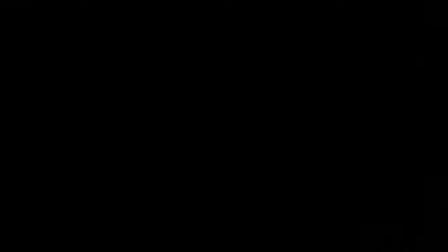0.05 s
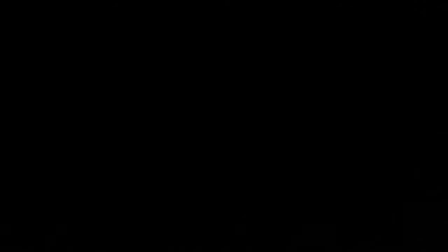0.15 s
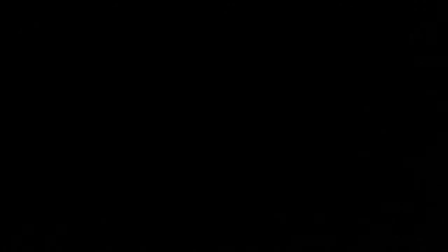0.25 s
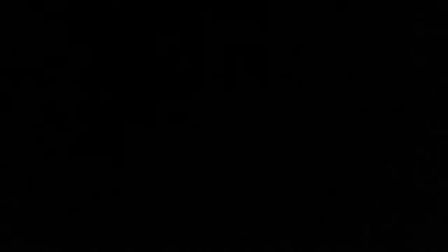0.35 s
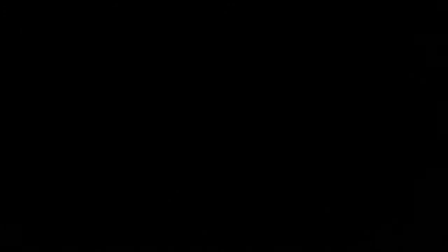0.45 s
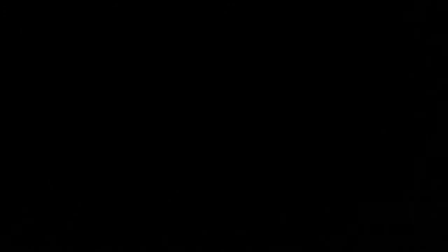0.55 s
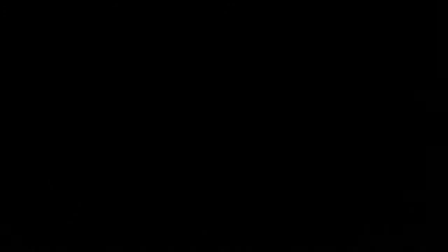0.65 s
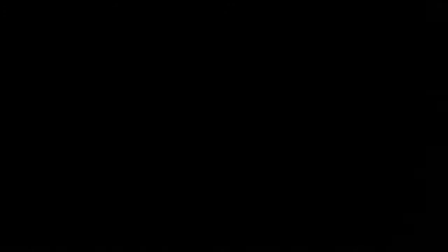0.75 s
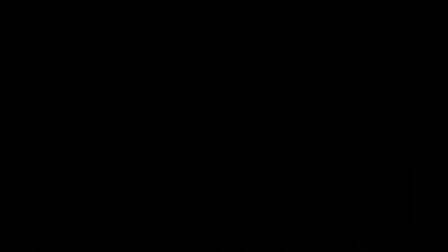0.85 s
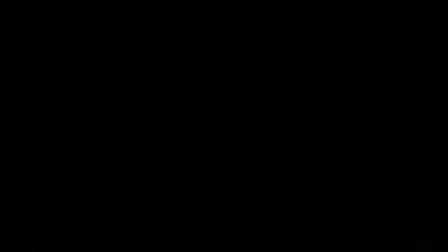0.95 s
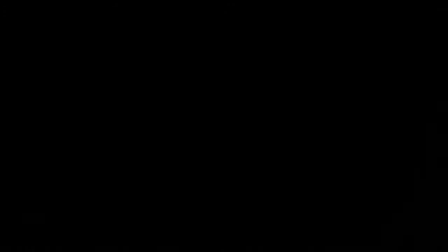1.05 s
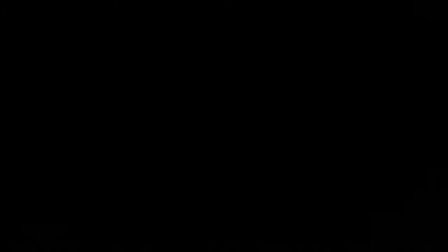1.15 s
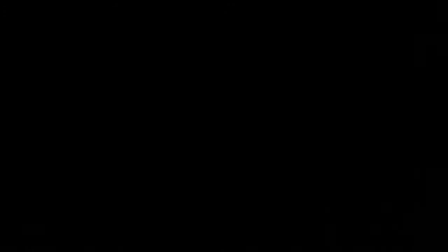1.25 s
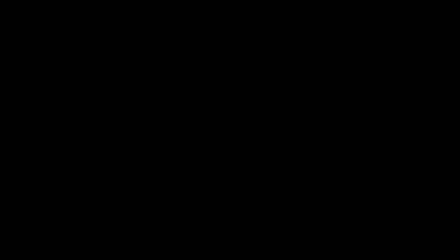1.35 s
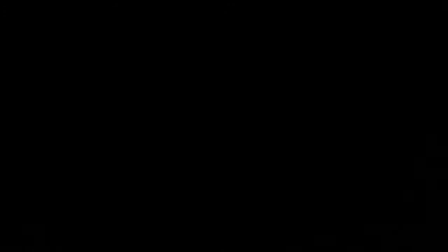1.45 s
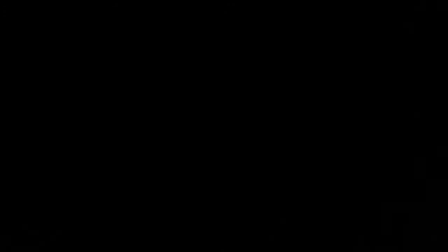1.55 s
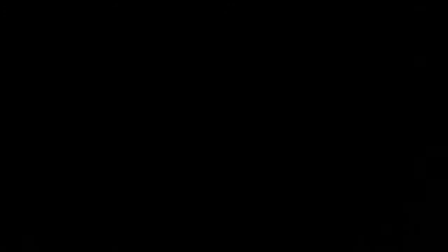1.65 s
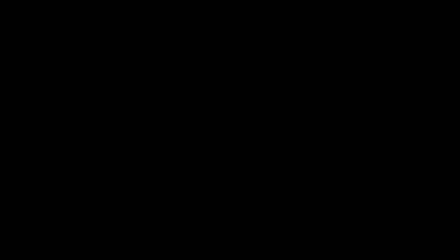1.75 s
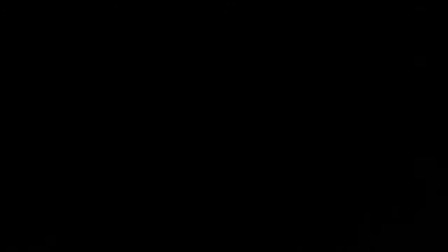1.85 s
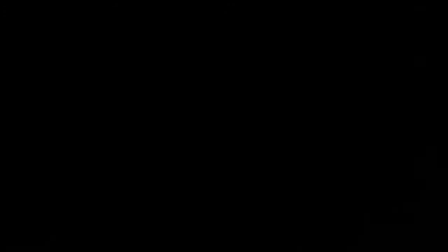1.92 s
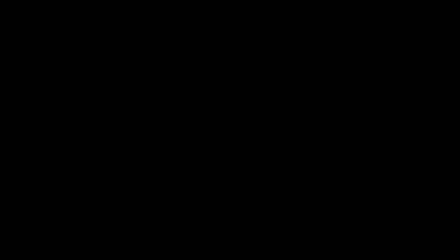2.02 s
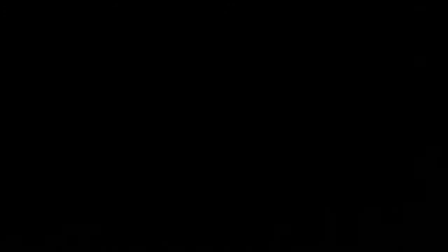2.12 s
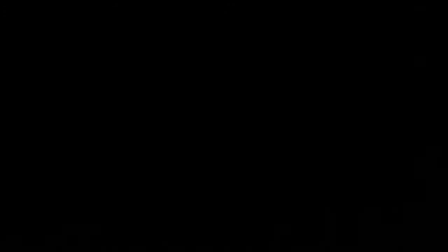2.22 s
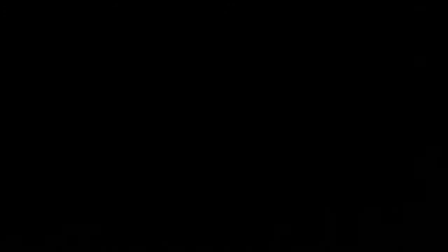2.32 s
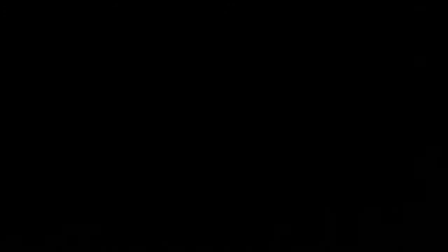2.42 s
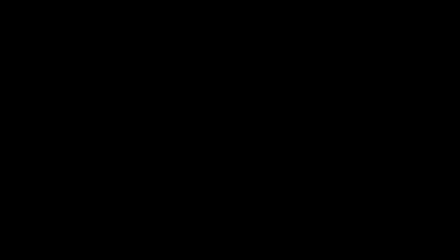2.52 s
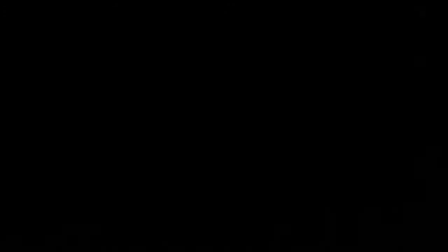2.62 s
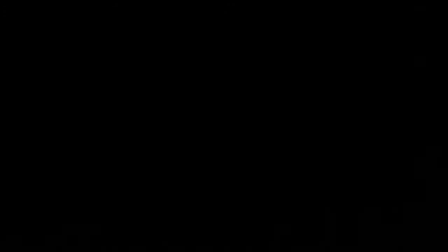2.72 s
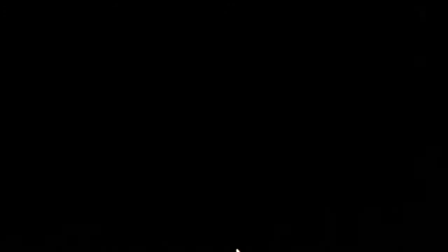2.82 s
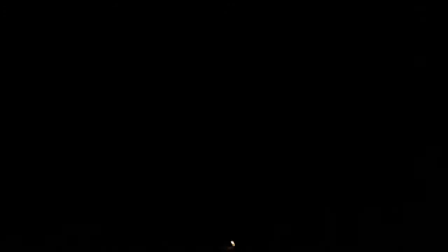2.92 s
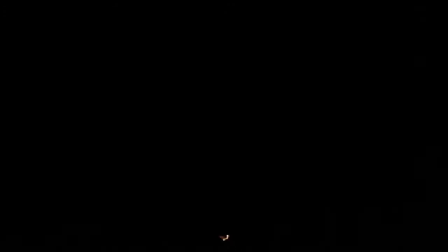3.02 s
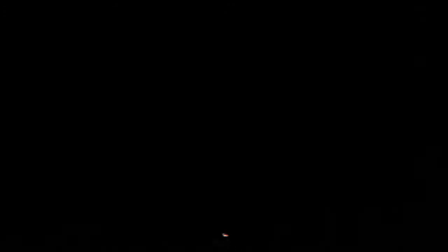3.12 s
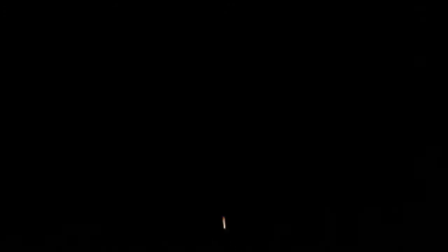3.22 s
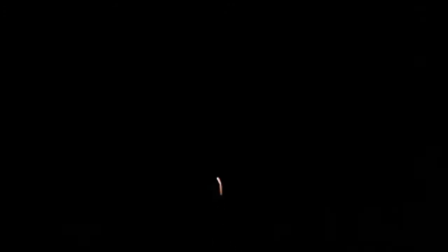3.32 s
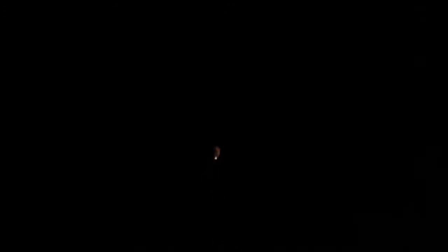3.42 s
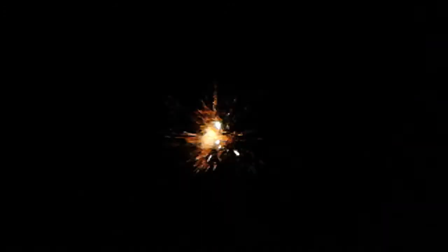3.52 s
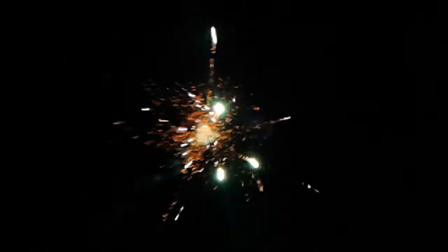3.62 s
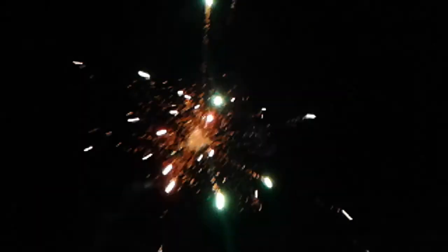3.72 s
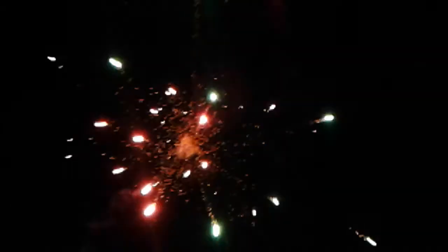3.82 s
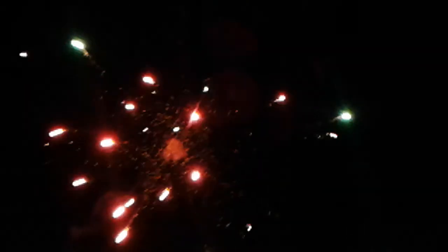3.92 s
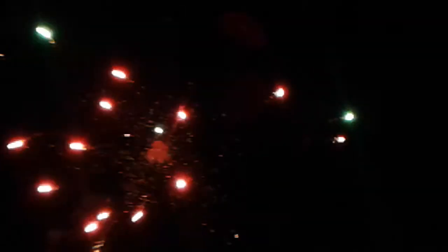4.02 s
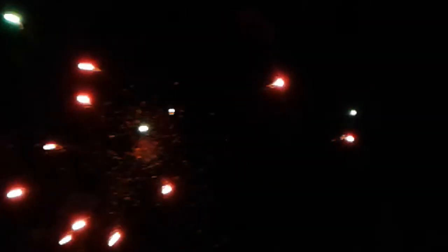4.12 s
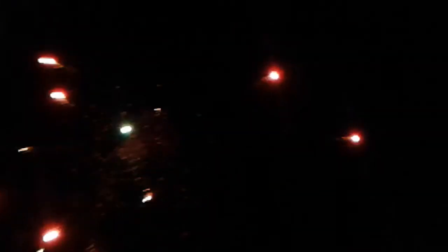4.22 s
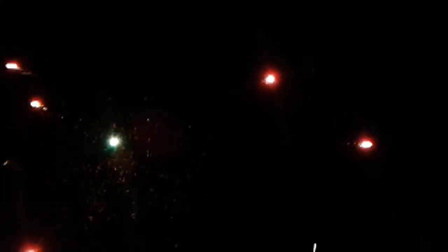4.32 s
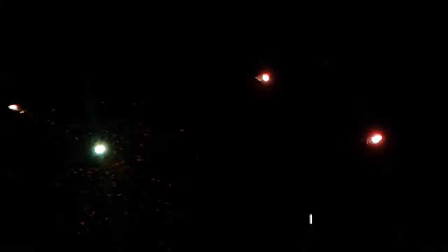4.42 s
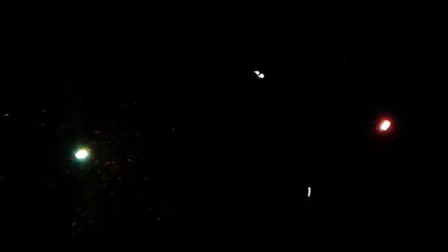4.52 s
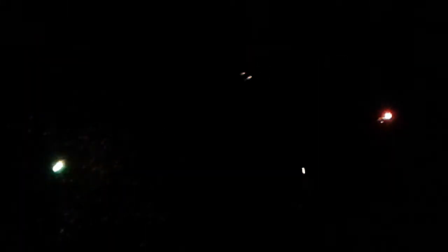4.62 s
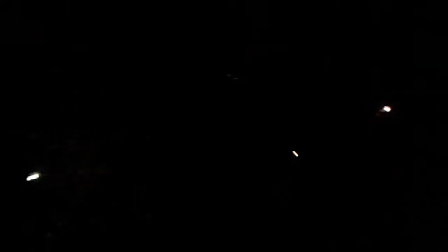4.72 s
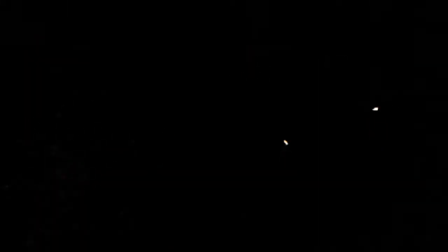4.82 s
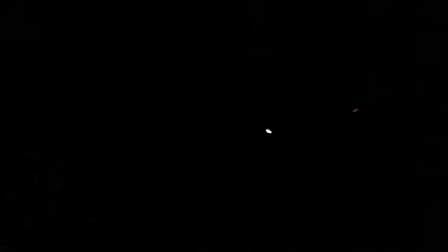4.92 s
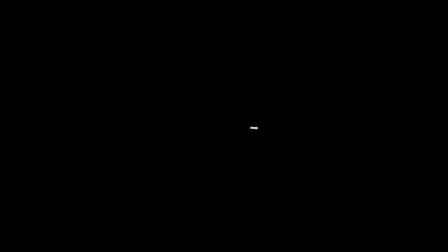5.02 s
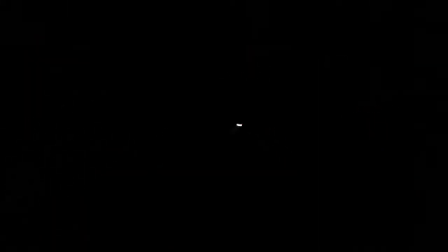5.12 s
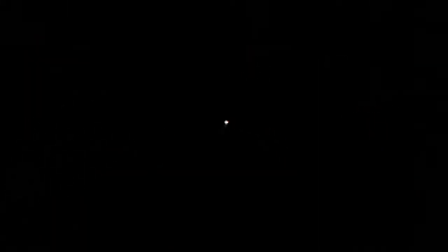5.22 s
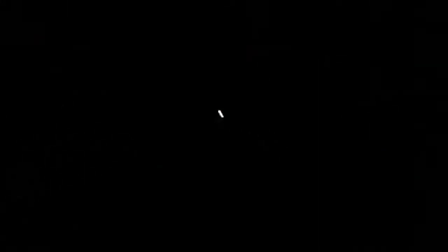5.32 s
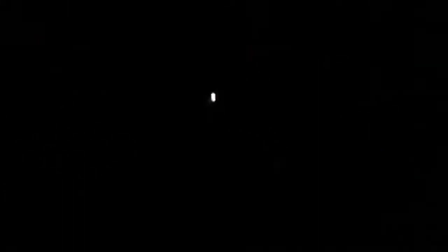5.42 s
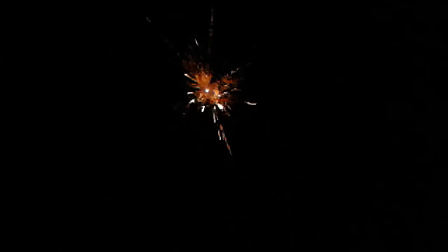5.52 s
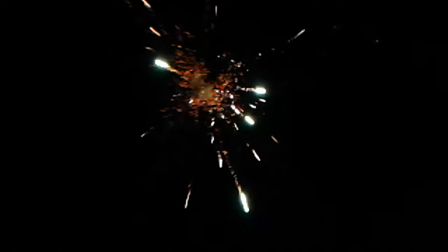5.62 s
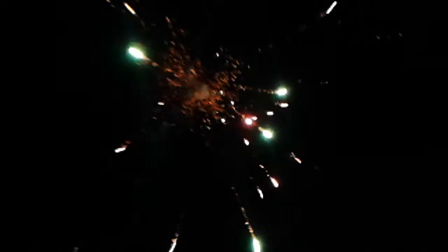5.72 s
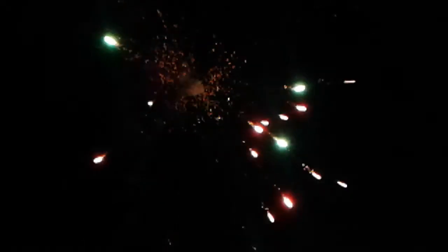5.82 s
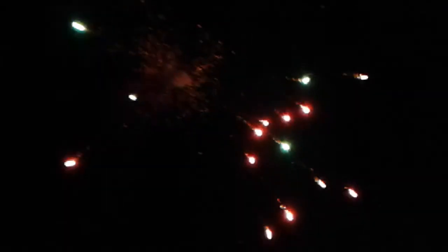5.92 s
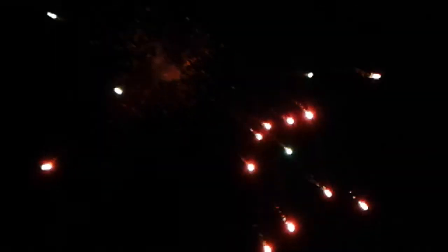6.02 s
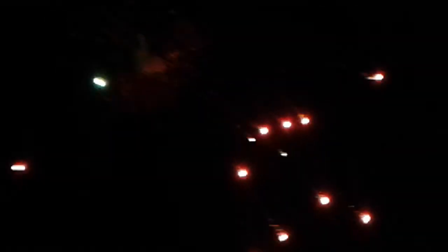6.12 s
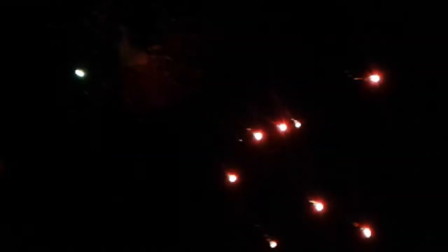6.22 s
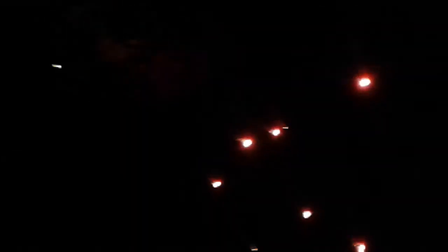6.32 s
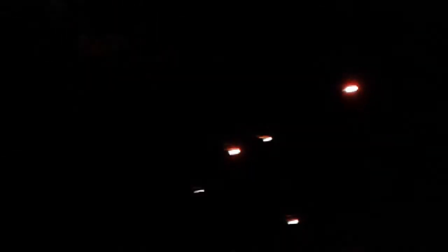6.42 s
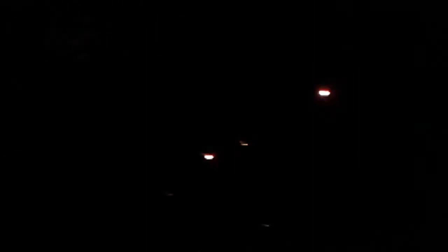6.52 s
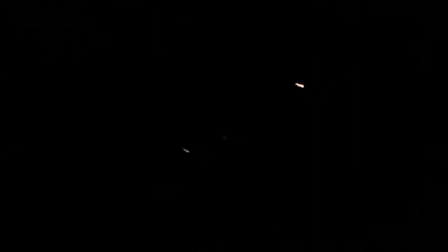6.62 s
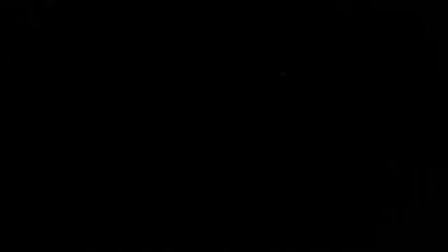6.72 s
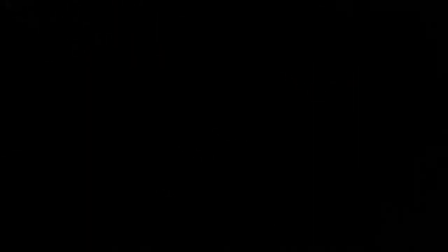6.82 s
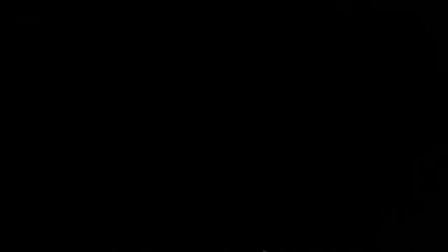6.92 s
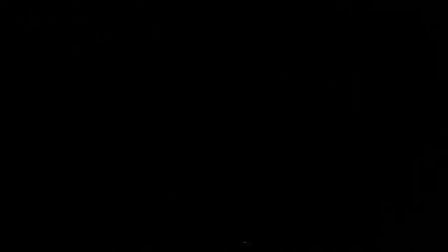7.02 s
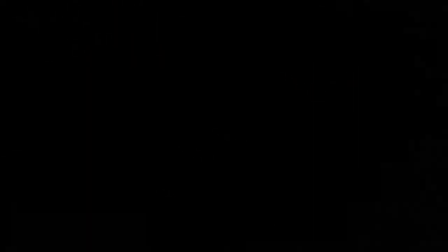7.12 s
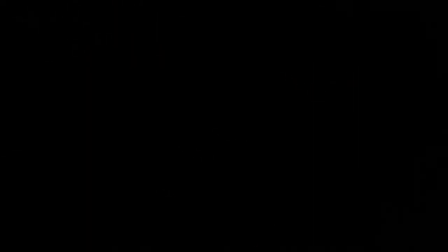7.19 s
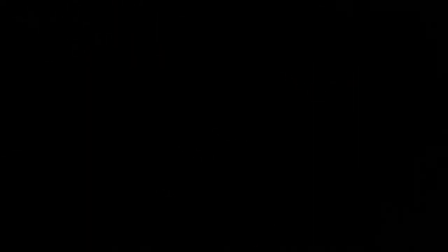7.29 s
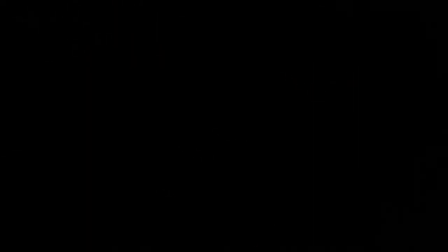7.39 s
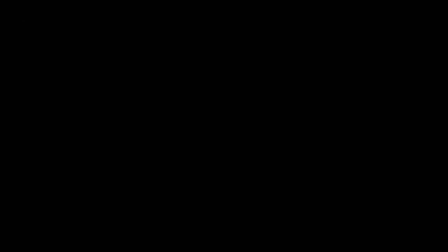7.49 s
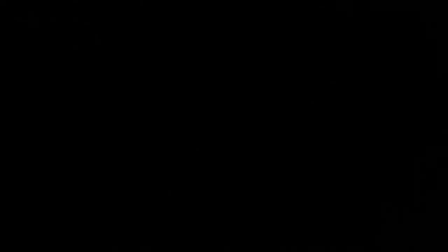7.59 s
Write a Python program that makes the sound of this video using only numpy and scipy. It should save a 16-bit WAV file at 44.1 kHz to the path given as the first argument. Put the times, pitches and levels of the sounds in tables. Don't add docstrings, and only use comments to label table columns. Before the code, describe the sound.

Two firework rockets launch with hard thumps in a walled yard at night, shriek down in pitch, and burst with loud overloading cracks.

```python
import sys
import numpy as np
from scipy import signal
from scipy.fft import rfft, irfft, next_fast_len
from scipy.io import wavfile
from scipy.ndimage import uniform_filter1d

SR = 44100
rng = np.random.default_rng(int(sys.argv[2]) if len(sys.argv) > 2 else 0)


def dump_mix(stems):
    frames = np.atleast_2d(stems).T
    limited = np.clip(frames, -1, 1)
    pcm = np.round(limited * 32767).astype(np.int16)
    wavfile.write(sys.argv[1], SR, pcm)


def gain_from_db(level_db):
    decades = np.asarray(level_db, float) / 20
    return 10 ** decades


N = 337409

# (frequency [Hz], level [dB])
NIGHT_COLOUR = [(24, -45.5), (60, -2.5), (120, -8), (300, -7), (600, -11), (1000, -19), (2000, -15),
                (2600, -24.5), (2900, -31.5), (4500, -35), (6500, -28.5), (9000, -35.5), (15000, -34)]
# (frequency [Hz], likeness [-1 to 1])
NIGHT_SAME = [(60, 0.04), (180, 0.94), (540, 0.26), (1630, 0.31), (4900, 0.01), (14700, 0.03)]
# (frequency [Hz], level [dB], width [Hz])
MACHINE_LINES = [(506.5, -50, 43), (744, -56, 34), (884, -58, 13), (1550, -54, 14), (1720, -59.5, 25),
                 (2024, -42.5, 5.8), (2250, -61.5, 26), (2520, -64.5, 26)]
# (peak time [s], level [dB], rise [s], fall [s])
GUSTS = [(.72, -43, 0.6, 0.66), (1.62, -37.5, 0.083, 0.29), (2.83, -48, 0.22, 0.58),
         (3.26, -59, 0.41, 0.31), (3.622, -47.5, 0.23, 0.11), (3.75, -61, .3, 0.67),
         (4.77, -37.5, 0.3, 0.39), (5.41, -44.5, 0.69, 0.76), (5.9, -55, 0.38, 0.21),
         (7.139, -38.5, 0.38, 0.04)]
# (time [s], level [dB], left over right [dB], frequency
# [Hz], length [cycles])
KNOCKS = [(0.766, -30, -23, 115, 0.59), (0.797, -37, 24, 169, 1.9), (0.81, -31, 5, 67, 2.6),
          (0.91, -26, 15, 106, 0.72), (0.883, -29, 31, 98, 0.93), (0.88, -27, 23, 274, 1.2),
          (0.85, -30, 9, 174, 1.8), (0.63, -36, 5, 135, 1.1), (0.78, -38, 0, 130, 1.2),
          (4.725, -32, 16, 84, 1.06), (4.79, -37, 3, 140, .8), (4.849, -28, 6, 185, 1.9),
          (4.845, -36, 8, 82, 1.6), (5.199, -32, -6, 130, 1.1), (5.301, -31.5, 21, 130, .8),
          (5.325, -35, 14, 100, 1), (5.394, -37.5, -9, 87, 0.76), (5.475, -35.5, -9.5, 110, 1.1),
          (5.506, -29.5, -15, 110, .8), (3.641, -7.5, -1, 190, 2.7), (5.68, -12.5, -5, 230, 1.8),
          (3.468, -11.5, -3, 100, 1.2), (1.334, -17, -2, 210, 0.83), (7.008, -20.5, 3, 93, 0.82),
          (7.035, -37, 21, 91.5, 1.12)]
# (time [s], level [dB], frequency [Hz], width [Hz], rise [s])
TICKS = [(1.028, -38.5, 2600, 1810, 0.022), (1.039, -52, 6720, 2500, 0.022),
         (1.241, -48, 6400, 2940, 0.0045), (6.85, -54, 6340, 2500, 0.027), (6.903, -41.5, 896, 897, .003),
         (7.089, -60, 6770, 2500, 0.0297), (7.28, -38, 7230, 6000, 0.0018),
         (7.399, -38.5, 6000, 4900, 0.0021), (7.47, -54, 5990, 296, 0.0055), (5.918, -37, 4480, 500, 0.011),
         (6.059, -42, 6500, 2060, 0.009)]
# (time [s], peak [dB], left over right [dB], T60 [s], treble [dB])
LAUNCHES = [(1.331, -3, -1, 0.048, -34), (1.348, -2.5, -0.5, 0.23, -8.5), (1.358, -1, -2, 0.034, -4),
            (1.438, -14.5, 1, 0.35, 9.5), (1.618, -17, 1.5, 0.091, 7.5), (3.434, -7.5, 2.5, 0.034, -34),
            (3.448, 0, 1, 0.11, -8.5), (3.463, -8, -3, 0.12, -14)]
# (time [s], peak [dB], left over right [dB], T60 [s], treble [dB])
BURSTS = [(3.633, 13.5, -2, 0.071, -4.5), (3.664, -2.5, -1, 0.11, -4), (3.768, -9, 6, 0.027, -9),
          (3.8, -6, -3, 0.046, 5), (3.883, -10.5, 1, 0.12, -10), (5.6701, 5.5, -3, 0.093, 1.5),
          (5.699, -5.5, -4, 0.16, -2.5), (5.745, -21.5, 0, 0.088, -1.5), (5.805, -20.5, -9, 0.076, -8.5),
          (5.842, -12.5, -6, 0.056, -18), (5.924, -14.5, -2, 0.063, -17), (5.922, -24.5, -3.5, 0.47, -4)]
# (frequency [Hz], density [dB per Hz])
LAUNCH_COLOUR = [(24, -57), (50, -14), (120, -2), (300, -1.5), (600, -12.5), (1000, -6.5), (1600, -16),
                 (3000, -16), (4800, -19), (6800, -8), (10000, -26.5), (15000, -59)]
# (frequency [Hz], density [dB per Hz])
BURST_COLOUR = [(24, -68.5), (40, -31), (200, -7), (260, -7.5), (400, -5.5), (640, -9), (1700, -20),
                (3470, -22.5), (8070, -26), (12000, -51), (15000, -44.5)]
# (time [s], rumble [dB], fall [dB/s], treble [dB], treble fade [s])
ROLLS = [
    (1.381, -36.5, 33.5, -9, 0.24),
    (3.48, -39.5, 17, 26.5, 2.5),
    (3.68, -30.5, 13, 25, 0.64),
    (5.721, -32, 24, 20, 0.68),
]
# (time [s], level [dB], swell [s])
HILLS = [
    (5.682, -32.5, 0.28),
    (7.68, -29, 0.14),
]
# (frequency [Hz], density [dB per Hz])
ROLL_COLOUR = [(24, -49), (40, -35.5), (125, -2.5), (466, 1.5), (514, -2.5), (1290, -13.5), (2640, -29.5),
               (6620, -27), (11400, -53), (15000, -55)]
# (frequency [Hz], likeness [-1 to 1])
ROLL_SAME = [(60, 0.67), (180, 1), (540, 0.8), (1630, 0.06), (4900, -0.0), (14700, 0.42)]
# (time [s], pitch [Hz])
PITCH = [
    [(1.42, 2925), (1.432, 3200), (1.443, 3824), (1.536, 3692), (1.596, 3368), (2.3, 2707), (2.75, 2395),
     (3.05, 2274), (3.62, 2200)],
    [(3.51, 3150), (3.55, 3280), (3.568, 3758), (3.603, 3695), (3.622, 3440), (4.0, 3058), (4.6, 2645),
     (5.1, 2401), (5.668, 2200)],
]
# (time [s], swing [%], half length [s])
LURCHES = [
    [(1.554, -1.56, 0.0052), (1.64, 3.5, 0.022), (1.683, -1.3, 0.014), (1.783, 2, 0.038),
     (1.837, -1, 0.026), (1.919, -1.5, 0.012), (1.935, 2.5, 0.015), (1.985, 3, 0.021), (2.031, -4.5, 0.046),
     (2.096, 3.5, 0.016), (2.124, 0, 0.0057), (2.166, -4.5, 0.049), (2.23, 5, 0.01), (2.272, 2, 0.017),
     (2.328, -3.5, 0.077), (2.408, 4.5, 0.033), (2.464, -3.5, 0.046), (2.583, -2, 0.064),
     (2.665, 0.5, 0.11), (2.711, -2.5, 0.029), (2.805, -2.2, 0.056), (2.941, -1, 0.06), (3.022, 1.8, 0.026),
     (3.178, -0.7, 0.024), (3.25, 1, 0.053), (3.324, -1.5, 0.055), (3.396, 1.5, 0.016), (3.435, -3, 0.076),
     (3.489, -3, 0.027), (3.539, 1.5, 0.013)],
    [(3.532, -2.5, 0.083), (3.69, 5, 0.024), (3.708, 1.1, 0.013), (3.735, -1.15, 0.028),
     (3.771, -1.5, 0.042), (3.807, 0.06, 0.013), (3.835, 2.5, 0.014), (3.871, -0.9, 0.029),
     (3.925, 2.7, 0.027), (3.951, -1, 0.013), (3.995, 0.2, 0.018), (4.015, -1.1, 0.015),
     (4.017, 3.3, 0.032), (4.049, 1, 0.0081), (4.065, -1.5, 0.0097), (4.131, 0.8, 0.072),
     (4.274, -0.8, 0.053), (4.408, -2, 0.051), (4.454, -1.5, 0.011), (4.49, -0.4, 0.027),
     (4.56, -2.0, 0.03), (4.611, 2, 0.015), (4.731, -2.5, 0.044), (4.847, -1, 0.023), (4.899, -1.4, 0.078),
     (5.021, 1.5, 0.063), (5.094, 0.5, 0.0071), (5.338, -0.8, 0.039), (5.458, -0.3, 0.087),
     (5.587, 0.5, 0.019)],
]
# (time [s], change [dB], half length [s])
NODS = [
    [(1.614, 0, 0.0098), (1.707, 3.5, 0.062), (1.773, 2.5, 0.014), (1.803, -3.5, 0.017), (1.841, 7, 0.019),
     (1.997, -1.5, 0.091), (2.045, -7, 0.0066), (2.106, 1.5, 0.075), (2.34, -2.5, 0.14),
     (2.422, 1.5, 0.046), (2.514, 2.5, 0.0068), (2.555, -5, 0.026), (2.701, -8.5, 0.019),
     (2.735, 5.5, 0.027), (2.766, 0.5, 0.012), (2.881, -16, 0.0087), (2.933, -9, 0.029),
     (3.006, 3.5, 0.051), (3.048, -12, 0.012), (3.075, 2.5, 0.017), (3.098, 3.5, 0.01), (3.13, 6.5, 0.046),
     (3.163, -13.5, 0.015), (3.195, 4, 0.011), (3.21, -8, 0.01), (3.244, 2.5, 0.08), (3.27, -6, 0.026),
     (3.302, -5.5, 0.0092), (3.37, 7, 0.031), (3.4, -10.5, 0.011), (3.415, 4, 0.014), (3.457, -8.5, 0.035),
     (3.501, 4.5, 0.02), (3.533, 1, 0.012), (3.567, -20, 0.011), (3.593, 3, 0.012)],
    [(3.558, 7.5, 0.013), (3.654, -4.5, 0.096), (3.712, 6, 0.031), (3.847, 6.5, 0.039),
     (3.889, -4.5, 0.079), (4.107, -5, 0.013), (4.188, 4, 0.015), (4.252, 5, 0.016), (4.266, -4, 0.016),
     (4.282, 5.5, 0.015), (4.298, -5, 0.014), (4.34, 1.5, 0.042), (4.444, -6.5, 0.069), (4.472, -7, 0.011),
     (4.512, -3, 0.008), (4.584, 0, 0.031), (4.627, -9.5, 0.027), (4.699, 2, 0.014), (4.763, 2.5, 0.055),
     (4.823, -3, 0.009), (4.869, -6, 0.09), (4.933, 2.5, 0.035), (5.047, -2, 0.035), (5.088, -1.5, 0.023),
     (5.212, -4, 0.048), (5.292, 4, 0.025), (5.33, 5, 0.014), (5.392, 3.5, 0.043), (5.517, -3.5, 0.049),
     (5.661, -8, 0.031)],
]
# (droop [share], length [s])
DROOPS = [
    (0.054, 0.08),
    (0.055, 0.016),
]
# (time [s], level [dB])
EFFORT = [
    [(1.42, -16), (1.45, -26.5), (1.5, -19.5), (1.75, -11), (2.2, -11), (2.7, -10), (2.92, -14),
     (3.56, -12), (3.62, -29.5)],
    [(3.51, -29.5), (3.57, -16), (3.73, -15.5), (4.15, -24), (4.46, -19.5), (4.78, -15.5), (5.07, -7),
     (5.2, -13), (5.668, -11.5)],
]
# (fundamental [dB], its fall [dB/s], hiss fall [dB/s], half lines [dB], their delay [s])
VOICES = [
    (-18.5, 11.5, 0.5, -14.5, 0.02),
    (-25.5, 4, 0.85, -1.5, 0.31),
]
# (port lag [s], hiss [dB], lock-in [s], flutter [0-1], pitch wobble [share])
ROCKETS = [
    (.00016, -30.5, 0.021, 0.72, 0.0027),
    (.0002, -30.5, 0.059, 0.68, 0.0025),
]
TUBE_ORDERS = (1, 2, 3, 4, 5, 6, .5, 1.5, 2.5)
# (pitch [Hz], third partial [dB], fourth and higher [dB])
TUBE = [(2200, -34.5, -30.5), (2308, -21, -21.5), (2600, -16, -21.5), (3200, -21, -22), (3490, -21.5, -31),
        (3590, -17.5, -24.5)]
# (time [s], change [dB], half length [s])
SWELLS_AND_DIPS = [(1.582, 2.5, 0.034), (1.662, 2, 0.023), (1.735, -2, 0.0092), (1.839, -5, 0.0087),
                   (1.889, 2, 0.023), (1.93, 4, 0.0069), (2.058, -3, .02), (2.22, -1, 0.025), (2.618, 4, .007),
                   (2.738, -2, 0.022), (3.128, -1, 0.011), (3.144, 3, 0.0098), (3.257, 5.5, 0.014),
                   (3.301, 2, 0.011), (3.422, -5, 0.012), (3.764, 3, .009), (3.796, -11, .006), (3.939, 3.5, 0.0099),
                   (3.973, 5, 0.011), (4.07, 1.5, .02), (4.133, 2, 0.008), (4.206, 2.5, 0.032), (4.317, -2, 0.0035),
                   (4.327, -7, 0.0036), (4.341, 2.5, .015), (4.389, 5, .009), (4.405, -8, 0.0042), (5.096, 5.5, .01),
                   (5.24, 2.5, .03), (5.512, 3.5, .03), (5.568, 1, .02)]
# (frequency [Hz], density [dB per Hz])
JET = [(300, -33), (1000, -4.5), (2400, -1.5), (3500, 4), (5000, 5.5), (7000, -0.5), (9000, -7),
       (10500, -12.5), (15000, -16.5)]
# (frequency [Hz], phase [turns])
PORT_TURN = [(2500, -0.29), (3500, -0.22), (5000, 0.011), (6500, -0.11), (8500, -0.28), (12000, -0.17)]
# (delay [s], level [dB])
WALLS = [
    (0.128, -40),
    (.27, -38),
]
# (frequency [Hz], level [dB])
SHADOW = [(300, 0.5), (2200, 2), (3500, -4.5), (4400, -6), (5000, -11.5), (6300, -10.5), (7000, -2),
          (7900, 7), (10000, 0.5), (14000, -8.5)]
# (time [s], change [dB], half length [s])
TREBLE_MASK = [(1.753, -2.5, .1), (2.25, 4, .2), (2.62, -2, .1), (3.155, 0.5, .18), (4.3, 4.5, .15),
               (4.78, -4.5, .08), (5.03, -6, .14), (5.208, 8, .08), (5.37, -5, .09), (5.556, 5.5, .11)]


def evened(x):
    return x / np.sqrt(np.mean(abs(x) ** 2) + 1e-20)


def read(points, hz):
    f, value = np.transpose(points)
    return np.interp(np.log(hz + 1), np.log(f + 1), value)


def bumps(t, rows):
    s, size, half = np.transpose(rows)[:, :, None]
    return (size * np.maximum(1 - abs(t - s) / half, 0)).sum(axis=0)


def panned(db, pan_db):
    return gain_from_db(db + np.array([[pan_db], [-pan_db]]) / 2)


def add(mix, s, sound):
    part = mix[:, round(s * SR):][:, :sound.shape[1]]
    part += sound[:, :part.shape[1]]


def drift(shape, hz):
    z = rng.standard_normal(shape) + 1j * rng.standard_normal(shape)
    return evened(signal.sosfilt(signal.butter(2, hz, fs=SR, output="sos"), z))


def causal(colour, treble_db):
    hz = abs(np.fft.fftfreq(4096, 1 / SR))
    level_db = read(colour, hz) + treble_db * hz / (hz + 2500)
    log_gain = np.log(gain_from_db(np.maximum(level_db, -100)))
    ring = np.fft.ifft(np.exp(np.conj(signal.hilbert(log_gain)))).real[:2048]
    return ring / np.linalg.norm(ring)


def wash(colour, likeness, patchy_db, treble_db=0):
    frames, hz = N // 256 + 5, np.fft.rfftfreq(1024, 1 / SR)
    a, b, c, d, patches = rng.standard_normal((frames, 513, 5)).T
    patches = uniform_filter1d(patches, size=10, axis=0)
    patches = evened(uniform_filter1d(patches, size=10, axis=1))
    same = np.clip(read(likeness, hz), -1, 1)[:, None]
    left = a + 1j * b
    right = same * left + np.sqrt(1 - same ** 2) * (c + 1j * d)
    z = np.array([left, right]) * gain_from_db(read(colour, hz)[:, None] + patchy_db * patches)
    lift_db = np.resize((treble_db * np.ones(N))[::256], frames) * (hz / (hz + 1500))[:, None]
    plain, lifted = (signal.istft(v, nperseg=1024, noverlap=768)[1][:, :N] for v in (z, z * gain_from_db(lift_db)))
    return lifted / np.std(plain)


def ducking():
    t = np.arange(N) / SR
    release_s = 0.57
    spans = [(p[0][0], p[-1][0], -3.5) for p in PITCH]
    spans += [(r[0], r[0] + 0.85, -19) for r in BURSTS if r[1] > 3]
    spans += [(p[0][0], p[0][0] + 1.18, -7.5) for p in PITCH]
    return np.min([db * (t > a) * np.clip(1 - (t - b) / release_s, 0, 1) for a, b, db in spans], axis=0)


def night():
    t = np.arange(N) / SR
    ports_t = t + np.array([[0], [.0003]])
    lines = 0
    for hz, db, width in MACHINE_LINES:
        waver = 1 + width / 40 * drift(N, width)
        lines = lines + gain_from_db(db) * waver * np.exp(2j * np.pi * hz * ports_t)
    air = gain_from_db(-46) * wash(NIGHT_COLOUR, NIGHT_SAME, 1.8) + lines.real
    return air * gain_from_db(uniform_filter1d(ducking(), size=2000))


def wind():
    t = np.arange(N) / SR
    calm_db, span_db = -57, 18
    push = rng.standard_normal(N) + 5.4 * rng.standard_normal((2, N))
    low = evened(signal.sosfilt(signal.butter(3, [50, 150], "band", fs=SR, output="sos"), push))
    gust_db = np.max([db - span_db * np.maximum((s - t) / rise, (t - s) / fall)
                      for s, db, rise, fall in GUSTS], axis=0)
    return low * gain_from_db(np.maximum(gust_db, calm_db) + 1.2 * drift(N, 12).real)


def knock(s, db, pan_db, hz, cycles):
    u = np.arange(round(.15 * SR)) / SR * hz / cycles
    shape = np.e * u * (1 - np.exp(-12 * u)) * np.exp(-u) ** 2 * 2
    push = shape * np.sin(2 * np.pi * cycles * u + 0.53 * np.exp(-u))
    return s - .004, panned(db, pan_db) * push


def tick(s, db, hz, width, rise):
    t = np.arange(round(.25 * SR)) / SR
    t60_s = .045 + 3 * rise
    shape = np.minimum(t / max(rise, 1e-4), 1) * gain_from_db(-60 * np.maximum(t - rise, 0) / t60_s)
    grains = (drift((2, len(t)), width / 2) * np.exp(2j * np.pi * hz * t)).real
    return s, gain_from_db(db) * shape * grains


def blast(row, colour, shocks_per_s, front, rise_s, snap):
    s, db, pan_db, t60, treble_db = row
    t = np.arange(round(.35 * SR)) / SR
    shared, own = rng.standard_normal(len(t)), rng.standard_normal((2, len(t)))
    sparse = rng.random(len(t)) < shocks_per_s / SR
    train = (shared + 0.5 * own) * sparse * np.sqrt(SR / shocks_per_s) * gain_from_db(-60 * t / max(t60, .01))
    train *= np.minimum(t / rise_s, 1)
    train[:, 0] += front
    crack = train * (0.92 + snap * gain_from_db(-60 * t / 0.015))
    ring = causal(colour, treble_db)[None]
    low = signal.sosfilt(signal.butter(2, 2200, fs=SR, output="sos"), ring)
    sound = signal.oaconvolve(train, low, axes=1) + signal.oaconvolve(crack, ring - low, axes=1)
    sound[0] = np.roll(sound[0], 8)
    return s, .5 * panned(db, pan_db) * sound


def roll():
    t = np.arange(N) / SR
    linger_db, dull_db = -39, -20
    latest = np.maximum(np.searchsorted([r[0] for r in ROLLS], t) - 1, 0)
    s, db, fall, top_db, fade = np.array(ROLLS)[latest].T
    age = np.maximum(t - s, 0)
    power = gain_from_db(db - fall * age) ** 2 * (age > 0) + gain_from_db(linger_db) ** 2 * (t > BURSTS[0][0])
    for at, hill_db, swell in HILLS:
        power += gain_from_db(hill_db - 20 * (at - t) / swell / 2) ** 2 * (t < at)
    treble = dull_db + (top_db - dull_db) * np.exp(-age / fade)
    lumps = gain_from_db(0.65 * drift(N, 5.1).real + np.array([[-1.5], [1.5]]))
    return wash(ROLL_COLOUR, ROLL_SAME, 1.7, treble) * uniform_filter1d(np.sqrt(power), size=400) * lumps


def tube_pitch(t, pitch, lurches, droop, wobble):
    age = t - t[0]
    steady = np.interp(t, *np.transpose(pitch))
    steady = steady * (1 - droop[0] * np.maximum(1 - (t[-1] - t) / droop[1], 0))
    fresh = 0.21 + np.exp(-(age / 1.6) ** 2)
    unsteady = wobble * drift(len(t), 55).real + 0.0058 * drift(len(t), 100).real
    unsteady = fresh * (unsteady + 0.008 * drift(len(t), 350).real)
    return steady, steady * (1 + unsteady + bumps(t, lurches) / 100)


def partial_levels(age, octave, steady, voice, lock_s):
    first_db, first_fall, _, halves_db, halves_s = voice
    catch = 16 * np.exp(-(age / 0.13) ** 8)
    first = 0.49 * octave + first_db - first_fall * age + catch
    tube_hz, third_db, fourth_db = np.transpose(TUBE)
    third = octave + np.interp(steady, tube_hz, third_db)
    fourth = octave + np.interp(steady, tube_hz, fourth_db)
    late = 40 * np.exp(-(age / lock_s) ** 8)
    halves = octave - late - 38 * np.exp(-(age / halves_s) ** 2) + halves_db - 28 * age ** 2
    odd = 2 * np.minimum(first - octave + 29, 0) - late
    return [first + odd, octave, third + odd, fourth - late, fourth - 2.5 + 0.55 * odd, fourth - 2.5,
            halves + catch - 16 - 12 * age, halves + 0.92 * catch, halves - 8.5]


def exhaust(age, octave, hiss_db, hiss_fall):
    spit = gain_from_db(1.6 * drift(len(age), 24).real)
    hiss = signal.oaconvolve(rng.standard_normal((2, len(age))), causal(JET, 0)[None], "same")
    jet = gain_from_db(0.44 * octave + hiss_db - hiss_fall * age) * spit * hiss
    band = signal.butter(2, [6900, 9000], "band", fs=SR, output="sos")
    sizzle = signal.sosfilt(band, hiss[:, ::-1])
    sizzle_db = 0.99 * uniform_filter1d(octave, size=900) - 36.5 + 7.9 * np.minimum(age, 1.5)
    return jet + gain_from_db(sizzle_db) * sizzle


def rocket(pitch, lurches, nods, droop, effort, voice, lag_s, hiss_db, lock_s, flutter, wobble):
    t = np.arange(effort[0][0], effort[-1][0], 1 / SR)
    age = t - t[0]
    octave = np.interp(t, *np.transpose(effort)) + bumps(t, nods + SWELLS_AND_DIPS)
    steady, hz = tube_pitch(t, pitch, lurches, droop, wobble)
    turns = np.cumsum(hz) / SR
    out = np.zeros((2, len(t)))
    quick = np.exp(-(age / 1.51) ** 2)
    rasp = 1 + 0.25 * (0.35 + quick) * drift(len(t), 130).real
    for k, db in zip(TUBE_ORDERS, partial_levels(age, octave, steady, voice, lock_s)):
        shared, own = (np.sqrt(quick) * drift(n, 55) + 0.77 * np.sqrt(1 - quick) * drift(n, 18)
                       for n in (len(t), (2, len(t))))
        flicker = 0.51 * shared + np.array([[0.8], [1.5]]) * own
        whole = k % 1 == 0
        air = whole + flutter * (.9 if k == 1 else 1) * flicker
        air = air / np.sqrt(1 + flutter ** 2) * rasp
        air = air / (abs(air) + .05) ** (0.42 * (whole and k > 1))
        air += (k / 2) ** 1.63 * gain_from_db(-23) * (1.09 + 1.3 * quick) * drift((2, len(t)), 110 * k)
        port_turns = k * hz * lag_s + read(PORT_TURN, k * steady)
        port = np.exp(2j * np.pi * port_turns * np.array([[0], [1]]))
        port[1] *= gain_from_db(-8 * np.exp(-age / 0.0151))
        line = np.sqrt(2) * (air * port * np.exp(2j * np.pi * k * turns)).real
        out += gain_from_db(db) * line * np.clip((14700 - k * hz) / 200, 0, 1)
    out += exhaust(age, octave, hiss_db, voice[2])
    lag = 800
    out[:, lag:] += out[:, :-lag] * gain_from_db(-4.5 - 53 * age)[lag:]
    return t[0], out * signal.windows.tukey(len(t), .01)


def scene():
    sky, near = roll(), night() + wind()
    for row in KNOCKS:
        add(near, *knock(*row))
    for row in TICKS:
        add(near, *tick(*row))
    for row in LAUNCHES:
        add(sky, *blast(row, LAUNCH_COLOUR, 6000, front=3.2, rise_s=0.007, snap=0.48))
    for *course, traits in zip(PITCH, LURCHES, NODS, DROOPS, EFFORT, VOICES, ROCKETS):
        s, whistle = rocket(*course, *traits)
        add(sky, s, whistle)
        for delay, db in WALLS:
            add(sky, s + delay, gain_from_db(db) * whistle[::-1] * (0.8 + 0.5 * drift(whistle.shape, 30).real))
    for row in BURSTS:
        front, rise_s, snap = (16, .0002, 3.5) if row[1] > 3 else (1.5, .005, .7)
        add(sky, *blast(row, BURST_COLOUR, 8900, front, rise_s, snap))
    size = next_fast_len(N)
    shadow = gain_from_db(read(SHADOW, np.fft.rfftfreq(size, 1 / SR)))
    sky[1] = irfft(rfft(sky[1], size) * shadow, size)[:N]
    return sky + near


def masked(x):
    below_db, near_db, flank_db, other_db = 51, 33, 17.5, 2.5
    window = np.sqrt(signal.windows.hann(2048, sym=False))
    hz, _, z = signal.stft(x, SR, window, 2048, 1024)
    edges = np.r_[20:120:5, 120:400:14, 400:684:14, 684:1024:28]
    widths = np.diff(np.r_[edges, 1025])
    power = np.add.reduceat(abs(z) ** 2, edges, axis=1) / widths[:, None]
    band_db = 10 * np.log10(power + 1e-20)
    band_hz = hz[edges][:, None]
    treble = np.clip(band_hz / 9000, 0, 1.3) ** 2
    peak_hz = hz[edges][10 + band_db[:, 10:].argmax(axis=1)][:, None]
    spread_db = 3 * abs(np.subtract.outer(np.arange(len(edges)), np.arange(len(edges))))[:, :, None]
    skirts_db = (band_db[:, None] - spread_db).max(axis=2)
    low_db = 10 * (band_hz < .48 * peak_hz) * np.clip(band_hz / 2000, 0.5, 1)
    flank = (band_hz < .62 * peak_hz) & (band_hz > 1700)
    beside_db = np.maximum(skirts_db - near_db + low_db, np.where(flank, skirts_db - flank_db, -200))
    loudest_db = band_db[:, 10:].max(axis=1, keepdims=True)
    loudest_db = np.maximum(loudest_db, loudest_db[::-1] - other_db)
    under_db = loudest_db - below_db + 5 * (band_hz > 9400) + 5.5 * treble + low_db
    limit_db = np.maximum(under_db, beside_db)
    mood = rng.standard_normal(band_db.shape[1:])
    limit_db += 5.5 * evened(uniform_filter1d(mood, size=3, axis=1))
    limit_db += treble * bumps(np.arange(z.shape[2]) * 1024 / SR, TREBLE_MASK)
    limit_db = np.maximum(limit_db, -112 - 20 * (1 - treble))
    bass_db = band_db[:, :16].mean(axis=(0, 1))
    attack = np.convolve(np.diff(bass_db, prepend=0) > 12, [1, 1], "same") > 0
    keep = ((band_db > limit_db) & (band_hz < 14700)) | (attack & (band_hz < 15300))
    z[:, edges[0]:] *= np.repeat(keep, widths, axis=1)
    return signal.istft(z, SR, window, 2048, 1024)[1][:, :N]


def low_pass(x):
    return signal.sosfilt(signal.butter(12, 15340, fs=SR, output="sos"), x)


def record(dry):
    knee, ceiling = .7, .97
    dry = signal.sosfilt(signal.butter(2, 36, "high", fs=SR, output="sos"), dry)
    over = np.maximum(abs(dry) - knee, 0)
    squashed = (ceiling - knee) * np.tanh(over / (ceiling - knee))
    clipped = np.sign(dry) * (np.minimum(abs(dry), knee) + squashed)
    finished = masked(clipped)
    return low_pass(finished)


dry = scene()
out = record(dry)
dump_mix(out)
```